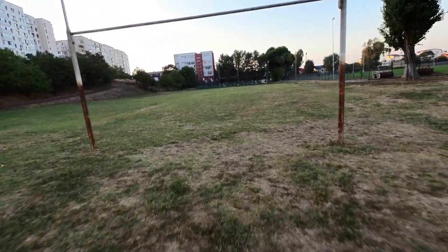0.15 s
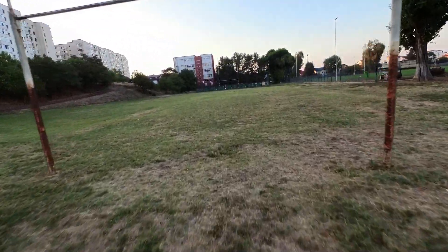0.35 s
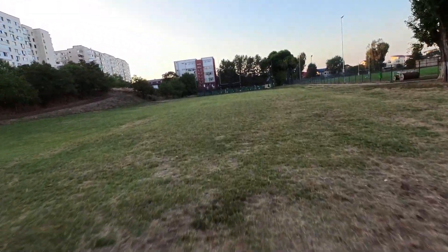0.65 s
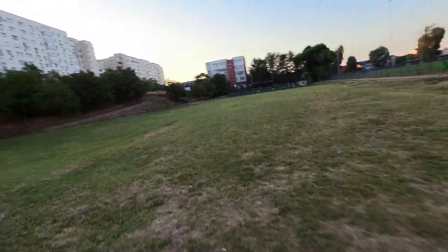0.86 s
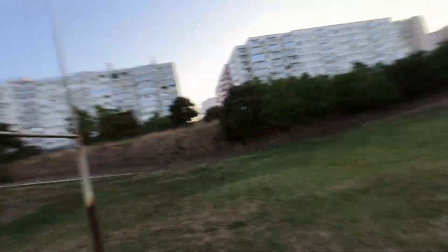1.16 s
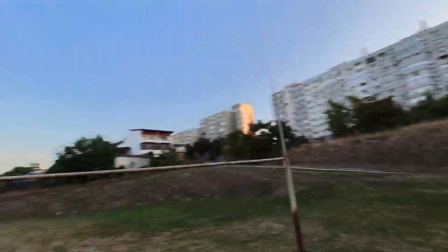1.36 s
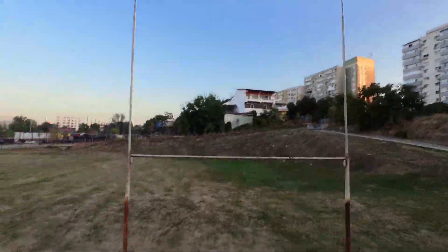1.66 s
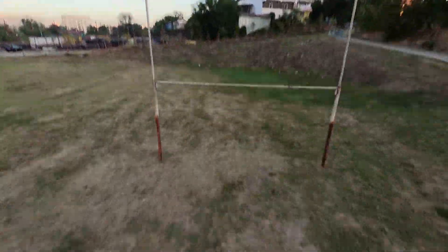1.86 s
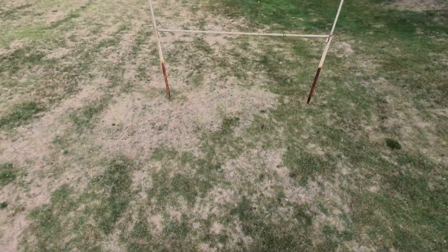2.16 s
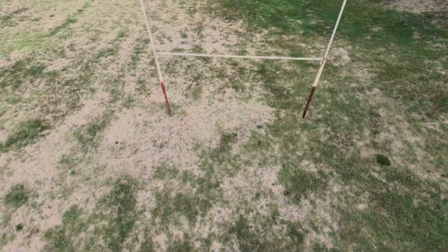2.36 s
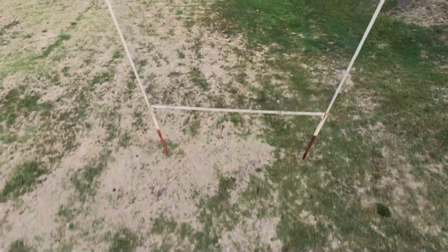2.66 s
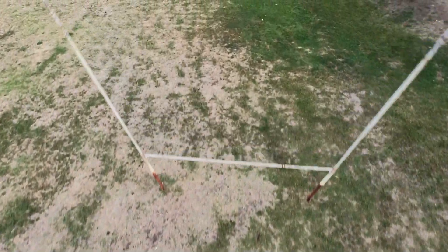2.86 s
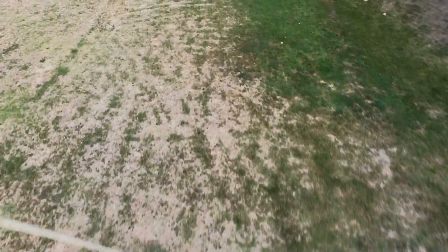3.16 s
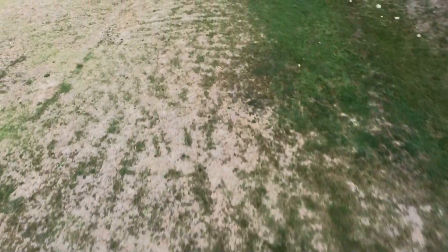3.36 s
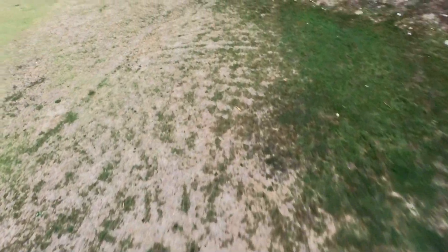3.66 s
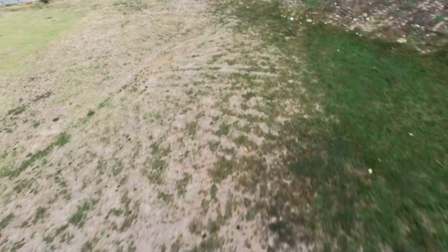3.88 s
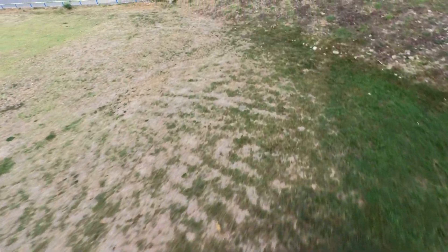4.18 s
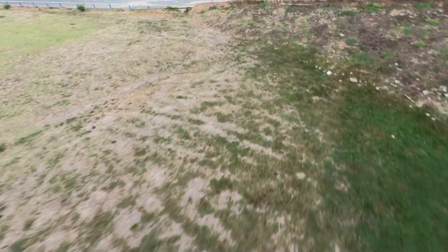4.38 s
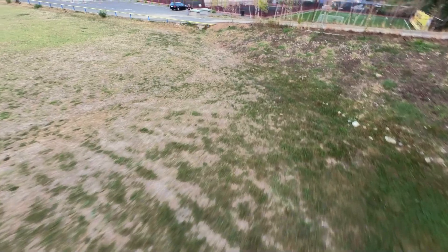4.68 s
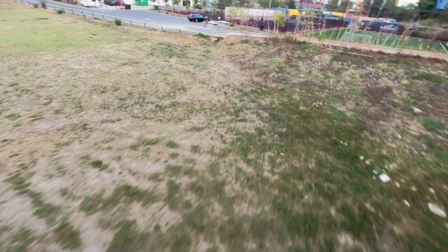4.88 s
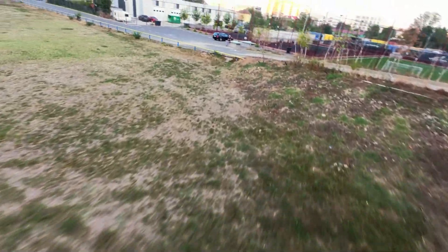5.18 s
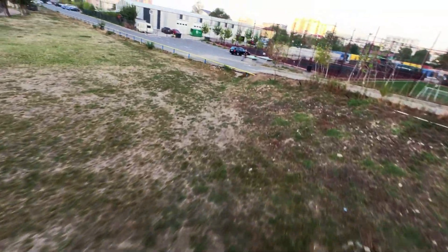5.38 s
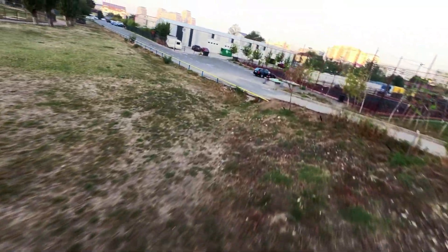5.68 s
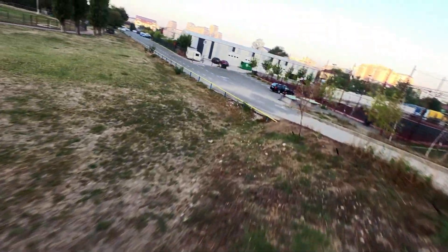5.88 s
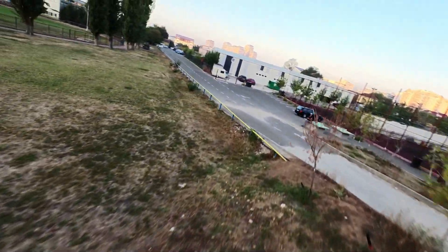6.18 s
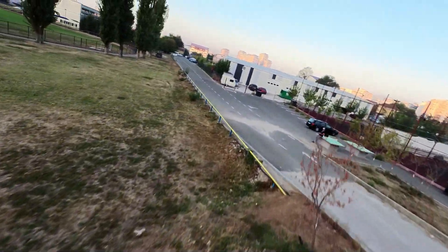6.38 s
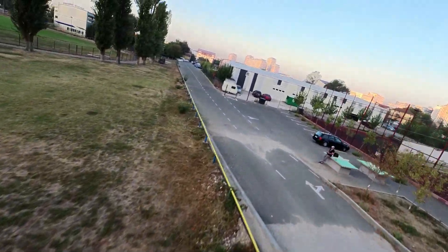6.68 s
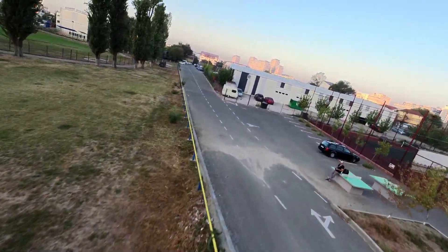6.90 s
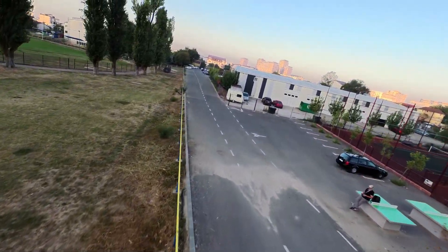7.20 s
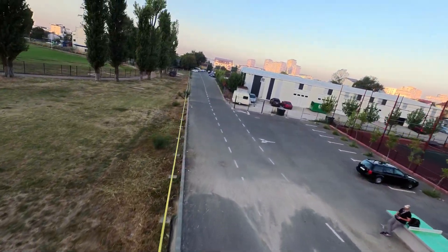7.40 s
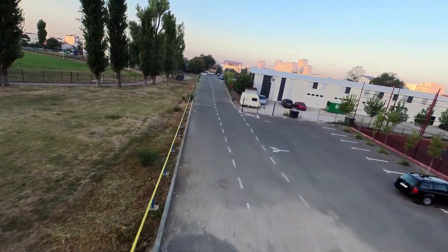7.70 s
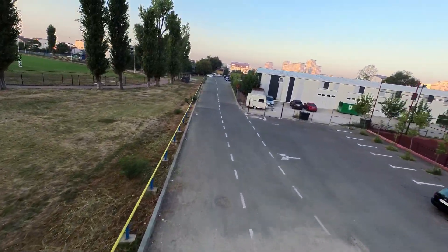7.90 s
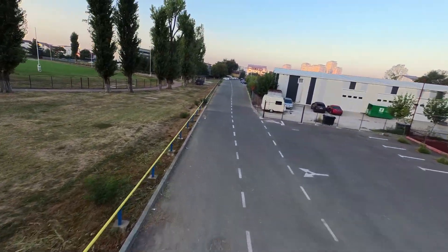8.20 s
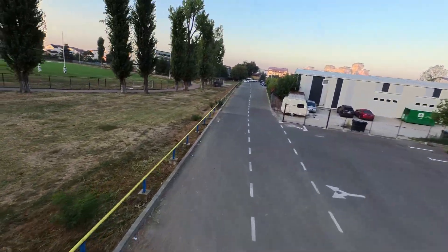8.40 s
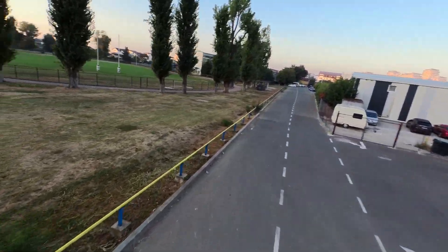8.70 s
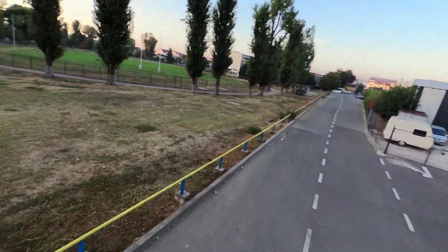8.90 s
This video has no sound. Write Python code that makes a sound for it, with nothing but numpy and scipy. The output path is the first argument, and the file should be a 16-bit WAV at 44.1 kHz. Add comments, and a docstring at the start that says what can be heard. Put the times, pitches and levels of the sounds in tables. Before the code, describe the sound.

Onboard a little quadcopter outdoors: buzzing high rotor whine over hissing air, a loud straining climb with popping buffets, a sudden sag, then fluctuating cruise.

```python
"""Four rotor whines beat together: a small ducted quadcopter flies low over a field, heard from its own camera.
The five-blade rotors each hold their own speed; they surge in a climb, idle, then cruise.
Each sings blade-pass tones, overtones and a shaft hum, built as sines that eddies blur.
Shaped noise makes their wash in ducts and frame, and the airstream that buffets the microphone.
Pressure pops shove the diaphragm when the rotors run fast."""
import sys
import numpy as np
from scipy import signal
from scipy.fft import rfft, irfft, next_fast_len
from scipy.io import wavfile
from scipy.ndimage import uniform_filter1d, map_coordinates

SR = 44100
rng = np.random.default_rng(int(sys.argv[2]) if len(sys.argv) > 2 else 0)


def unload_audio(sound):
    """Save the sound as a 16-bit wav file, at the path given as the first command line argument."""
    columns = np.transpose(np.atleast_2d(sound))
    # keep every value between -1 and 1, then stretch to whole-number steps
    steps = np.round(np.clip(columns, -1, 1) * 32767)
    wavfile.write(sys.argv[1], SR, steps.astype(np.int16))


N = 399105  # length [samples]

# rotors A to D at the microphone, before pitch, surges and wavering: (whine [dB], its gain under load [dB],
# octave [dB], its gain in calm air [dB], shaft hum [dB], its gain under load [dB])
ROTOR_LEVELS = [(-30.5, 10, -36, 11.5, -49.5, 13.5), (-35, 7, -45, -2, -49, 9), (-26, 1, -36, -4, -50, 0),
                (-33, 7.5, -48, 1, -39, -7)]
# the rotors bite hard to turn and climb, the whine swells: (start [s], attack [s], hold [s], release [s])
LOAD_PHASE = (1.34, 0.2, 1.58, 0.17)
# blade-pass strength by pitch, frame resonances included: (frequency [Hz], level [dB])
WHINE_BY_PITCH = [(1100, -6.5), (1220, -9), (1380, -19), (1560, -13), (1750, -8), (1920, -4.5), (2200, 2),
                  (2450, 6.5), (2850, 8)]
# strength of its octave by pitch, frame resonances included: (frequency [Hz], level [dB])
OCTAVE_BY_PITCH = [(2200, -4), (3000, -14), (3500, -24), (3900, -6), (4300, 1), (4850, 10.5), (5100, 5),
                   (5300, -2), (5700, -14)]


def rotors(skirt_db=-14, waver_db=0.65, hum_per_decade_db=55):
    """Four rotors at a fixed distance from the microphone; tones follow speed, load and the calm of the air."""
    load, calm = swell(*LOAD_PHASE), swell(*CALM_PHASE)
    skirt = wash_level(RASP_LAW_DB) + skirt_db
    shake = hum_per_decade_db * effort()
    sound = np.zeros(N)
    for name, hz, levels in zip("ABCD", speeds(), ROTOR_LEVELS):
        whine_db, load_db, octave_db, calm_db, hum_db, hum_load_db = levels
        whine_surge, octave_surge = surges(name)

        whine = whine_db + along(WHINE_BY_PITCH, hz) + load_db * load
        whine = whine + whine_surge + waver_db * wobble(7)

        octave = octave_db + along(OCTAVE_BY_PITCH, 2 * hz) + calm_db * calm
        octave = octave + octave_surge + waver_db * wobble(7)

        hum = shake + hum_db + hum_load_db * load
        sound = sound + rotor(hz, whine, octave, skirt, hum)
    return sound


BLADES = 5
# how the frame carries the blade overtones: (frequency [Hz], gain [dB])
FRAME_RESPONSE = [(3000, -1), (6500, 4.5), (7300, -20), (7900, 4), (8500, -25), (10500, 3), (14000, 6)]
# how the frame passes the shaft hum: (frequency [Hz], gain [dB])
MOUNT_RESPONSE = [(230, -8), (290, -7), (328, 1.5), (375, -11), (440, -6.5), (490, -14), (540, -9.5),
                  (600, -2)]


def rotor(blade_hz, whine_db, octave_db, skirt_db, shake_db, hunting=0.001993, flutter_db=0.9,
          third_db=-21.5, fourth_db=-26.5, sideband_db=-23, second_hum_db=-5):
    """One propeller: the blade-pass whine, its overtones and the hum of its shaft."""
    # the flight controller keeps trimming the speed
    trimmed_hz = blade_hz * (1 + hunting * wobble(35))
    phase = 2 * np.pi * (np.cumsum(trimmed_hz) / SR + rng.random())
    shaft = phase / BLADES

    def rough(db):
        """A loud tone stands clear; a weak one is broken up by turbulence."""
        return np.interp(db, [-36, -16], [.6, .14])

    strength = amp(whine_db + flutter_db * wobble(28))
    whine = strength * partial(phase, order=1, rough=rough(whine_db), rate=260)
    octave_strength = amp(octave_db + flutter_db * wobble(28))
    octave = octave_strength * partial(phase, order=2, rough=1.25 * rough(octave_db), rate=240)

    # chopped eddies spread a broad skirt of noise that travels with the octave
    skirt = amp(skirt_db) * wobble(700) * np.cos(2 * phase)

    # slightly unequal blades put lines at the shaft orders around the whine
    lines = np.cos(phase - shaft) + 0.53 * np.cos(phase - 2 * shaft) + 0.6 * np.cos(phase + shaft)
    sidebands = strength * amp(sideband_db + 3.4 * wobble(11)) * lines

    third = amp(third_db) * partial(phase, order=3, rough=0.72, rate=200)
    fourth = amp(fourth_db) * partial(phase, order=4, rough=1.2, rate=550)
    overtones = filtered(strength * (third + fourth), lambda hz: amp(along(FRAME_RESPONSE, hz)))

    hum_db = shake_db + along(MOUNT_RESPONSE, blade_hz / BLADES) + 3.4 * wobble(11)
    hum = amp(hum_db) * (np.cos(shaft) + amp(second_hum_db) * np.cos(2 * shaft))
    return np.sqrt(2) * (whine + octave + skirt + sidebands + overtones + hum)


def partial(phase, order, rough, rate):
    """One blade harmonic, blurred in strength and phase by eddies that come rate times a second."""
    eddies = unit(wobble(rate) + 1j * wobble(rate))
    return np.real(np.exp(1j * order * phase) * (1 + rough * eddies))


# throttle, as the blade-pass rate that the rotors share: (time [s], rate [Hz])
THROTTLE_CURVE = [(0, 1911), (.53, 1895), (.78, 1740), (1.08, 1963), (1.58, 2000), (1.8, 2313), (2.6, 2337),
                  (2.78, 2289), (3, 1945), (3.21, 1326), (3.37, 1296), (3.88, 1706), (4.3, 1725),
                  (4.45, 2118), (4.87, 2156), (5.25, 1710), (5.47, 2080), (5.85, 2047), (6.15, 2125),
                  (6.36, 2040), (6.54, 2175), (6.88, 1560), (7.45, 1471), (8.1, 1813), (8.4, 1903),
                  (8.59, 2086), (8.93, 2025), (9.05, 2190)]
# steering, each rotor's lead over the throttle: (time [s], A [Hz], B [Hz], C [Hz], D [Hz])
STEERING_LEADS = [(0, 316.5, 439.5, -385, -370), (.78, 200.5, 260, -170, -260),
                  (1.08, -120, 284, -38, -155), (1.22, -59, 40, -70, -190), (1.3, 62.5, -99, -162, -234),
                  (1.39, 150, 160, -200, -205), (1.48, 60, 500.5, -43.5, -173),
                  (1.58, 82, 244.5, -108, -302), (1.7, 240.5, 446, -200, -504),
                  (2.1, 344.5, 534, -135, -331), (2.42, 105, 280, 82, -50), (2.76, -31, 125, 120, -15),
                  (3.65, -320, -278, 18.5, 29), (3.88, -185, 170, 140, -170), (4.02, -160, 335, 235, -160),
                  (4.3, -165, 445, 280, -130), (4.53, -335, 480, 357, -300), (4.87, -380, 400.5, 305, -360),
                  (5.25, -230, 455, 125, -300), (5.47, -273, 418, 66, -211),
                  (6.54, -360, 287.5, 112.5, -250), (6.88, -90, 240, 174, -137),
                  (9.05, -142, 248, 170, -487)]


def speeds():
    """Blade-pass rate of each rotor [Hz]: throttle plus steering."""
    return curves(THROTTLE_CURVE)[0] + np.array(curves(STEERING_LEADS))


CRUISE_HZ = 2000


def effort():
    """Mean rotor speed, in decades above cruise."""
    return np.log10(speeds().mean(axis=0) / CRUISE_HZ)


# one rotor bites harder as the craft leans:
# (rotor [letter], start [s], hold [s], whine gain [dB], octave gain [dB])
ROTOR_SURGES = [("A", 1.08, .16, 15, 13), ("B", 1.26, .15, 9, -4), ("A", 1.52, .08, 3, -3),
                ("B", -.1, .55, 2, 7), ("D", 1.7, .35, 4, 0), ("B", 2.86, .9, 4, 0),
                ("A", 3.75, 1.2, 10, 0), ("B", 3.85, .35, 2, 7), ("B", 5.1, .2, 0, 9),
                ("C", 5.36, 1.12, 4.5, 0), ("A", 5.38, .45, 6, 0), ("B", 7.7, .6, 0, 6)]
SURGE_ATTACK_S, SURGE_RELEASE_S = 0.063, 0.096


def surges(name):
    """Extra dB of one rotor's whine and octave as the craft leans on it."""
    gains = np.zeros((2, N))
    for which, start, hold, whine_db, octave_db in ROTOR_SURGES:
        if which == name:
            envelope = swell(start, SURGE_ATTACK_S, hold, SURGE_RELEASE_S)
            gains = gains + np.outer([whine_db, octave_db], envelope)
    return gains


# wash colours, low to high, relative levels: (frequency [Hz], level [dB per Hz])
ROAR_SPECTRUM = [(400, -39), (780, -7), (940, -18.5), (1090, -1.5), (1300, -9.5), (1550, -2), (1800, -0.5),
                 (2000, 1), (2350, 4), (2700, 0), (3100, -6.5), (3600, -35.5), (5000, -36)]
RASP_SPECTRUM = [(2200, -20.5), (3000, -12), (3700, -8), (4200, -4), (4550, -3), (4830, 3.5), (5150, -3),
                 (5550, -1), (5800, -8), (6200, -9), (6650, -5.5), (7050, -15), (9000, -34)]
HISS_SPECTRUM = [(2500, -16), (3600, -41), (4400, 9.5), (6000, -18), (7300, -4), (8100, 2), (8600, 4),
                 (9700, 1.5), (10500, 2.5), (12400, -3.5), (13200, 4.5), (13900, -10), (14900, 0.5),
                 (16000, -8)]
# wash laws: (level at cruise [dB], growth [dB per tenfold rotor speed], change in calm air [dB])
ROAR_LAW_DB = (-24, 24.6, -4.5)
RASP_LAW_DB = (-23.5, 42, -3.5)
HISS_LAW_DB = (-26.5, 62, -6.5)


def wash():
    """Turbulent air in the ducts, coloured by fixed resonances of frame and camera shell."""
    churn = wobble(40)  # shared by all three bands
    roar_db = wash_level(ROAR_LAW_DB) + 0.19 * churn + 0.19 * wobble(60)
    rasp_db = wash_level(RASP_LAW_DB) + 0.17 * churn + 0.73 * wobble(98)
    hiss_db = wash_level(HISS_LAW_DB) + 0.25 * churn + 0.14 * wobble(150)
    roar = amp(roar_db) * rush(ROAR_SPECTRUM, patchy_db=1.88)
    rasp = amp(rasp_db) * rush(RASP_SPECTRUM, patchy_db=2.0)
    hiss = amp(hiss_db) * rush(HISS_SPECTRUM, patchy_db=3.0)
    return roar + rasp + hiss


# near the top of the climb the rotors draw clean air, less wash and purer octaves:
# (start [s], attack [s], hold [s], release [s])
CALM_PHASE = (1.624, 0.79, 0.31, 0.72)
WASH_PER_AIRSTREAM = 0.14  # dB of wash per dB of airstream: fast flight stirs the inflow


def wash_level(law):
    """Level in dB of one wash noise: it grows with rotor speed and airstream and shifts in calm air."""
    cruise_db, per_decade_db, calm_db = law
    stream = curves(AIR_LEVELS)[0]
    stirred = WASH_PER_AIRSTREAM * (stream - stream.mean())
    return cruise_db + per_decade_db * effort() + stirred + calm_db * swell(*CALM_PHASE)


# air over the microphone: (time [s], airstream level [dB], duct draught level [dB])
AIR_LEVELS = [(0, -37, -37.5), (1.4, -37, -41), (1.9, -34.5, -37), (2.5, -40, -44), (3.1, -43, -41),
              (3.9, -37, -40.5), (4.6, -26.5, -33), (5.7, -28.5, -32), (6.3, -31, -34.5), (7.2, -36, -32.5),
              (7.75, -37.5, -31), (8.4, -37, -32), (9.05, -32, -37)]
# wind colours, relative levels: (frequency [Hz], level [dB per Hz])
BUFFET_SPECTRUM = [(10, -18), (25, -2), (45, 1), (100, -1), (180, -8.5), (400, -18), (1000, -62)]
AIRSTREAM_SPECTRUM = [(40, -16), (130, 2.5), (250, 3), (400, 1), (600, -4.5), (1000, -27), (3000, -39)]
DRAUGHT_SPECTRUM = [(200, -16), (480, 3), (650, 5), (790, 6.5), (930, 7), (1090, 8.5), (1300, 5),
                    (2000, -5), (4000, -32)]
# gusts that break on the camera: (start [s], hold [s], level [dB])
CAMERA_GUSTS = [(1.7, .45, -33), (2.25, .35, -31), (3.25, .5, -34), (8.65, .12, -35), (3.91, .06, -22)]
GUST_ATTACK_S, GUST_RELEASE_S = 0.07, 0.21


def wind(buffet_db=-39.0, buffet_grows=0.74, lumps_db=-0.9):
    """The airstream of the flight, with low lumps where it breaks on the camera, most of all in gusts."""
    stream, draught = curves(AIR_LEVELS)
    buffet = amp(buffet_db + buffet_grows * (stream - stream.mean()))
    gusts = sum(amp(db) * swell(start, GUST_ATTACK_S, hold, GUST_RELEASE_S)
                for start, hold, db in CAMERA_GUSTS)
    lumps = unit(amp(lumps_db * wobble(45)) * rush(BUFFET_SPECTRUM, patchy_db=3))
    buffeting = np.hypot(buffet, gusts) * lumps
    airstream = amp(stream + wobble(40)) * rush(AIRSTREAM_SPECTRUM, patchy_db=1)
    duct_draught = amp(draught) * rush(DRAUGHT_SPECTRUM, patchy_db=1.6)
    return buffeting + airstream + duct_draught


# the hardest pressure pops on the microphone: (time [s], peak level [dB])
HARD_POPS = [(1.842, -14.5), (2.303, -11), (2.393, -12), (2.463, -16)]
POP_ONSET_HZ, POP_FULL_HZ = 2200, 2354  # mean blade-pass rates between which the smaller pops set in


def pops(small_db=-16, scatter_db=1.5, per_s=34, rise=0.00079, recoil=0.013):
    """At full throttle, pops shove the diaphragm one way; it creeps back as the pressure leaks off."""
    t = np.arange(SR // 8) / SR
    push = t / rise * np.exp(1 - t / rise)
    leak = t * np.exp(-t / recoil)
    pop = push - leak * push.sum() / leak.sum()  # the recoil cancels the push in the long run

    s, db = np.transpose(HARD_POPS)
    hard = np.bincount(np.round(s * SR).astype(int), amp(db), N)
    rate = per_s * np.interp(speeds().mean(axis=0), [POP_ONSET_HZ, POP_FULL_HZ], [0, 1])
    struck = rng.random(N) < rate / SR
    small = struck * amp(small_db + scatter_db * rng.standard_normal(N))
    return signal.fftconvolve(hard + small, pop)[:N]


# frame resonances reach both microphones alike, the air between them differs:
# (frequency [Hz], side minus mid [dB])
STEREO_WIDTH = [(1900, -73), (2950, -54), (3200, 0), (4000, -7.5), (4850, -15.5), (5550, -12), (5950, -6),
                (6600, -6.5), (7200, -2), (8600, -4.5), (12500, -2.5), (13100, -6), (13900, -1),
                (15500, -9)]


def rush(spectrum, patchy_db):
    """Stereo noise in short-lived patches, its middle at rms 1: mono in the bass, wide in the treble."""
    cells = signal.stft(rng.standard_normal((2, N)), nperseg=256)[2]
    field = rng.standard_normal(cells.shape[1:])
    field = uniform_filter1d(field, size=3, axis=0)  # across frequency
    field = uniform_filter1d(field, size=8, axis=1)  # across time
    patchy = signal.istft(cells * amp(patchy_db * unit(field)))[1][:, :N]

    def mid_and_side(hz):
        """Gains of the middle and of the difference between the microphones."""
        mid_db = along(spectrum, hz)
        return amp([mid_db, mid_db + along(STEREO_WIDTH, hz)])

    mid, side = filtered(patchy, mid_and_side)
    return np.array([mid + side, mid - side]) / np.std(mid)


def amp(db):
    """Decibels to gain."""
    return 10 ** (np.asarray(db) / 20)


def unit(x):
    """Scale to rms 1."""
    return x / np.sqrt(np.mean(np.abs(x) ** 2) + 1e-20)


def along(points, hz):
    """Read (frequency [Hz], value) points on a log axis."""
    f, v = np.transpose(points)
    return np.interp(np.log(hz + 1), np.log(f + 1), v)


def curves(rows):
    """One value per sample for each column after the time."""
    s, *cols = np.transpose(rows)
    return [np.interp(np.arange(N) / SR, s, c) for c in cols]


def wobble(rate):
    """A smooth random curve, rate knots a second."""
    knots = rng.standard_normal(int(N * rate / SR) + 4)
    coarse = np.arange(0, N, 8)  # every eighth sample, joined by straight lines
    return np.interp(np.arange(N), coarse, map_coordinates(knots, [coarse * rate / SR]))


def swell(start, attack, hold, release):
    """An envelope from 0 up to 1 and back, times in seconds."""
    corners = start + np.cumsum(np.abs([0, attack, hold, release]))
    return np.interp(np.arange(N) / SR, corners, [0, 1, 1, 0])


def filtered(x, response):
    """x times a response of frequency."""
    m = next_fast_len(N + SR // 4)
    return irfft(rfft(x, m) * response(np.fft.rfftfreq(m, 1 / SR)), m)[..., :N]


def scene():
    """Whine, wash, wind and pops together at the camera."""
    return rotors() + wash() + wind() + pops()


TOP_HZ = 15800  # band limit of the camera


def record(dry):
    """The camera rounds off the highest peaks and keeps nothing above its band limit."""
    held = dry / (1 + np.abs(dry) ** 8) ** (1 / 8)
    return filtered(held, lambda hz: 1 / (1 + (hz / TOP_HZ) ** 400))


dry = scene()
out = record(dry)
unload_audio(out)
```